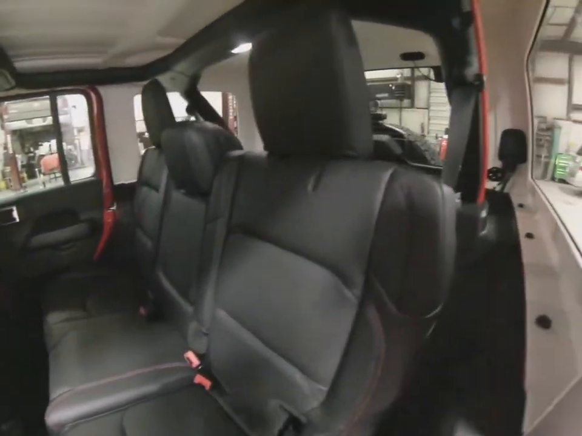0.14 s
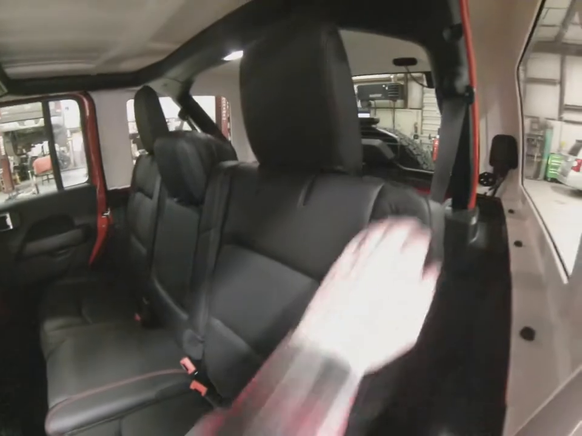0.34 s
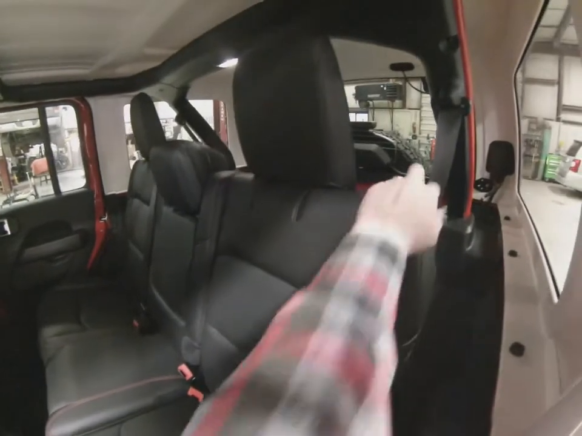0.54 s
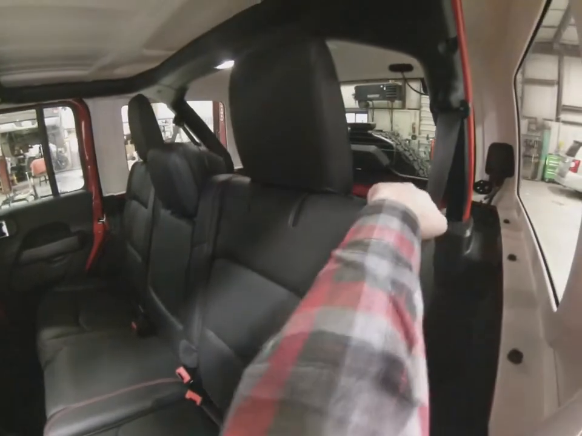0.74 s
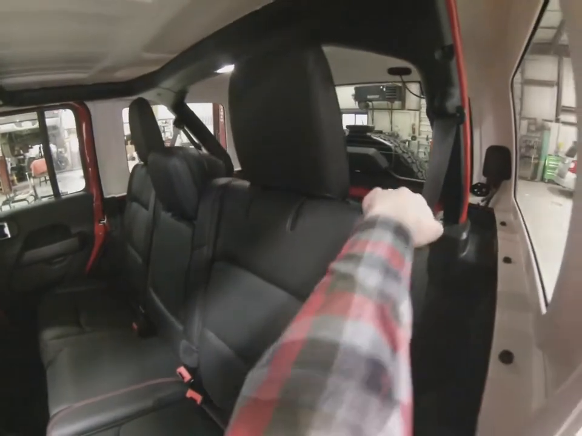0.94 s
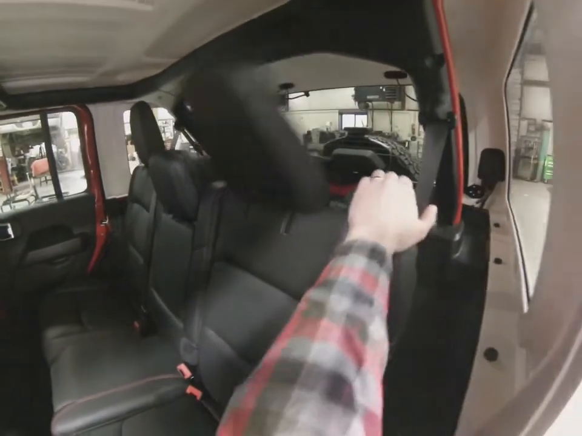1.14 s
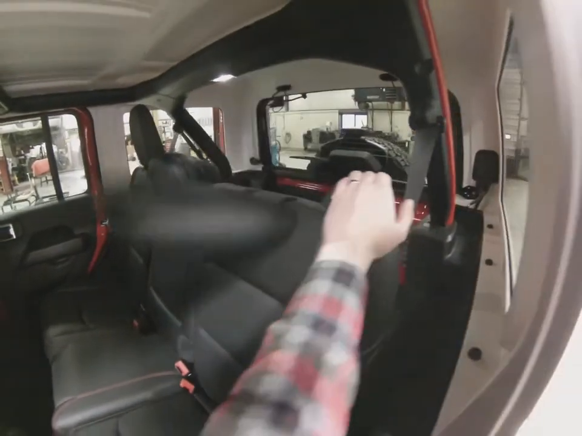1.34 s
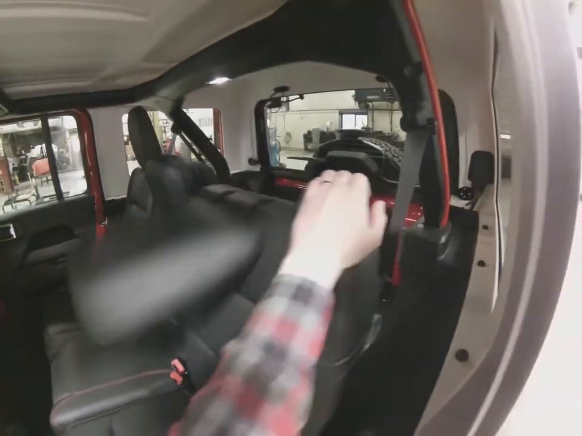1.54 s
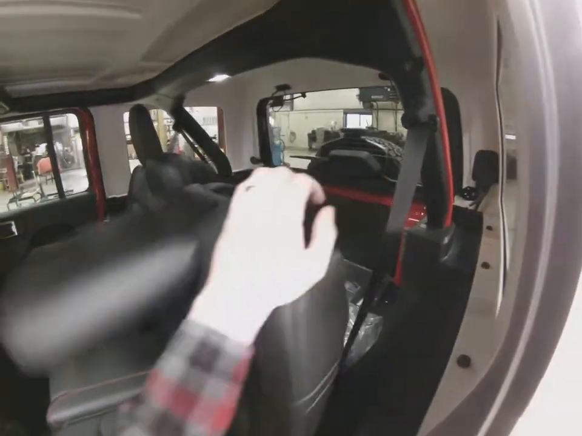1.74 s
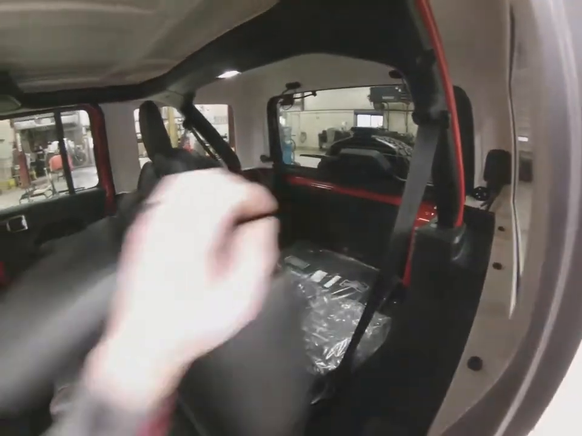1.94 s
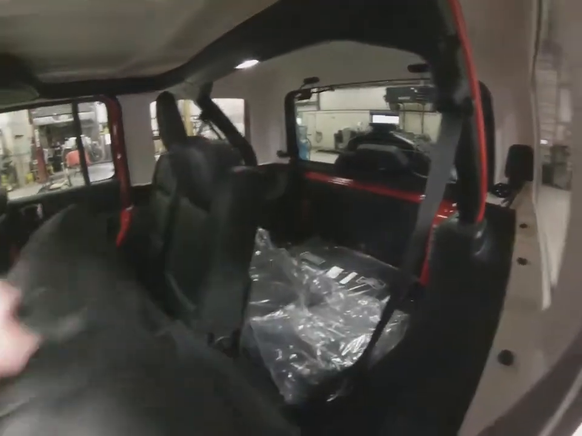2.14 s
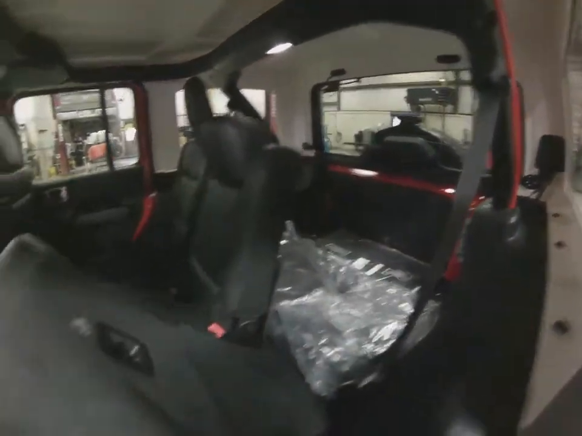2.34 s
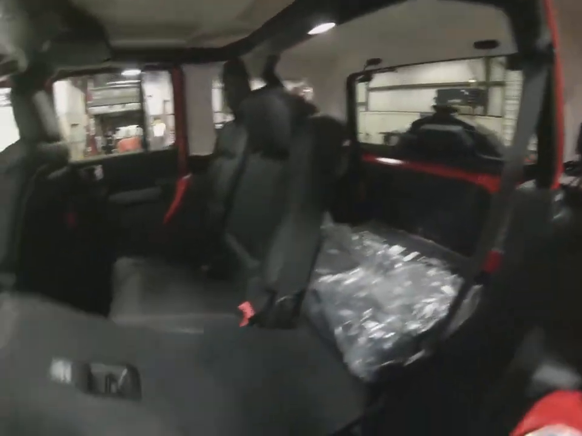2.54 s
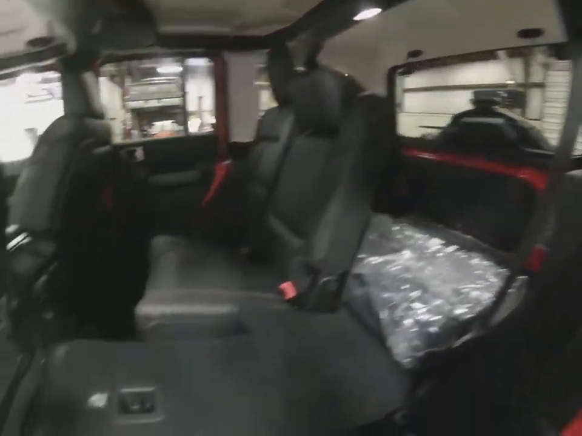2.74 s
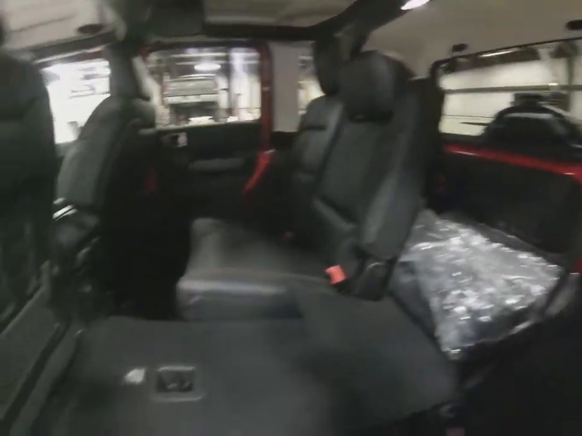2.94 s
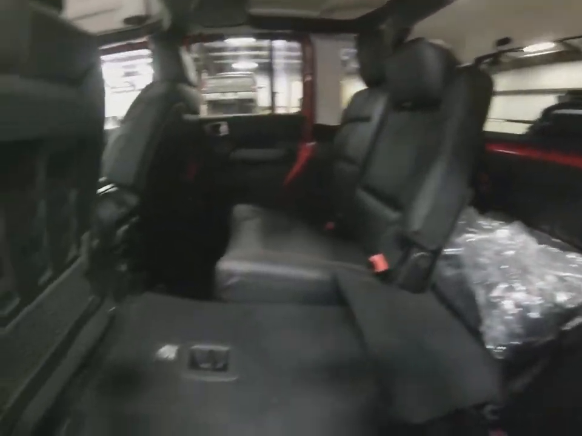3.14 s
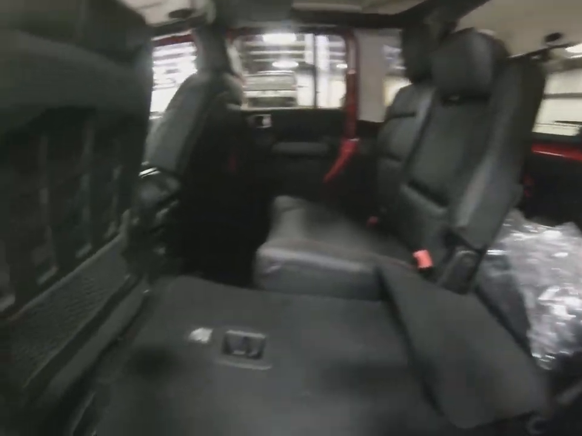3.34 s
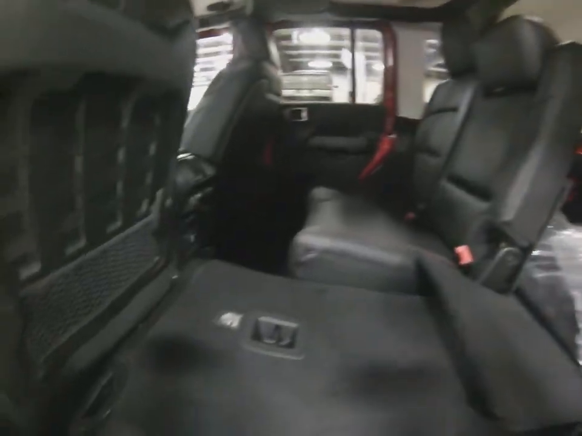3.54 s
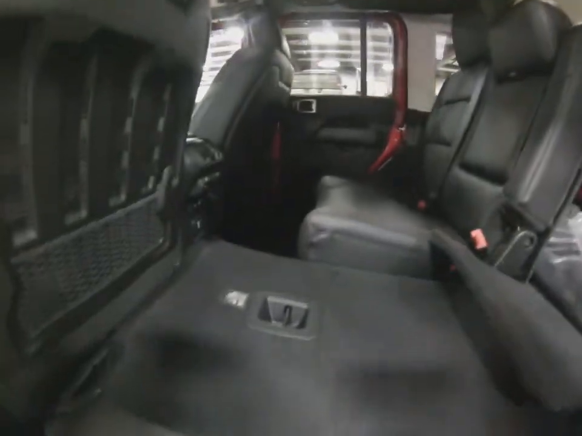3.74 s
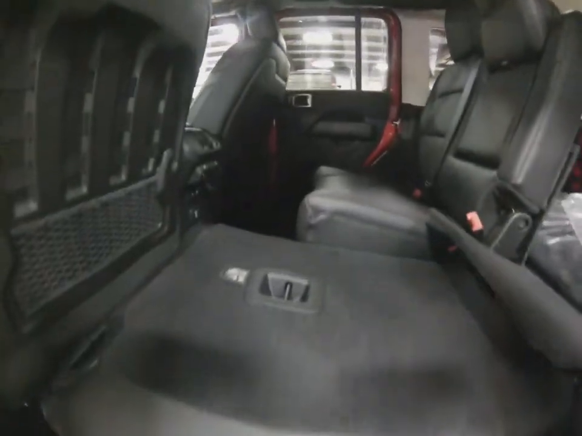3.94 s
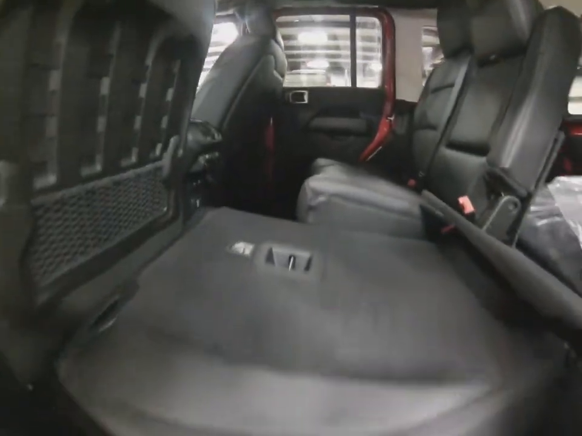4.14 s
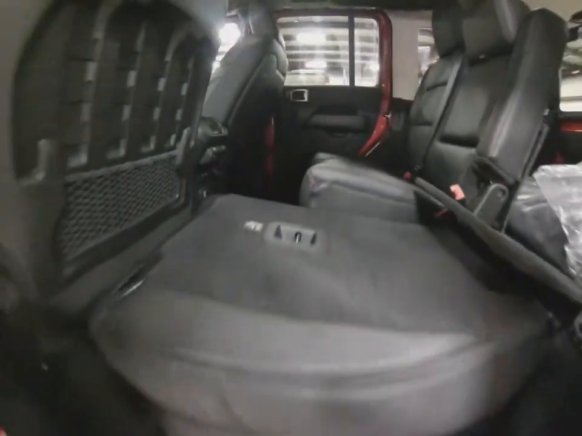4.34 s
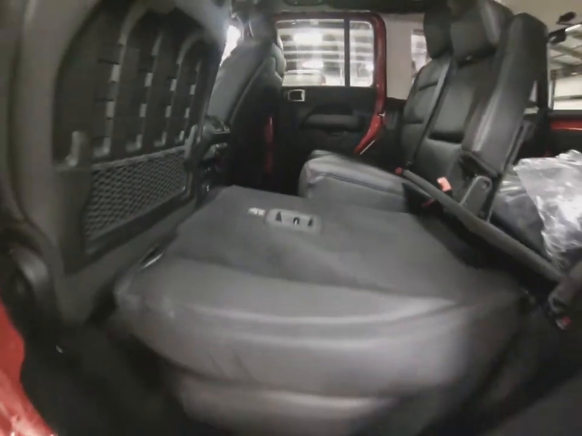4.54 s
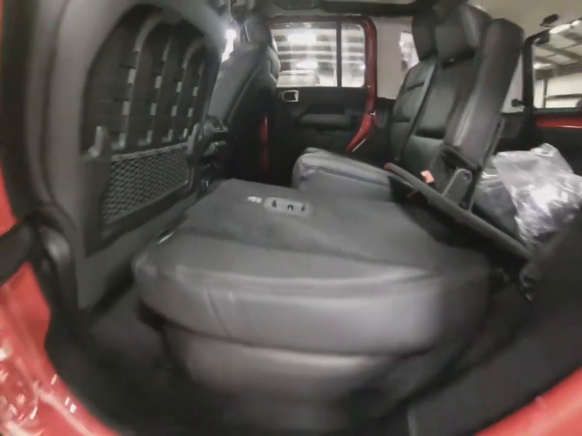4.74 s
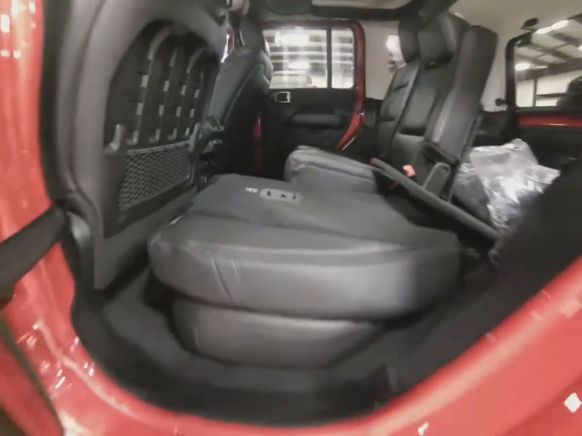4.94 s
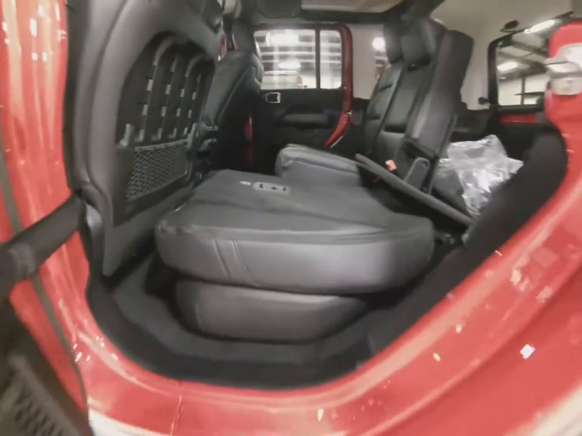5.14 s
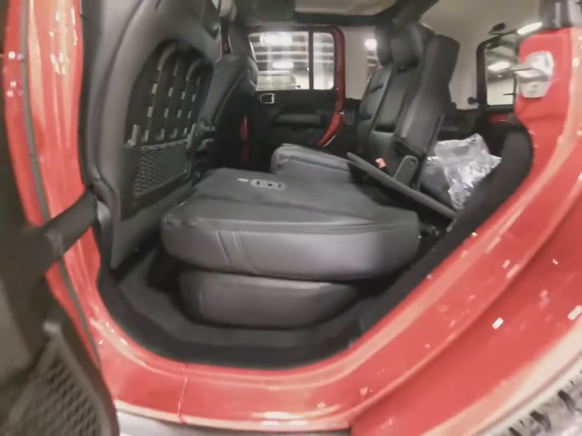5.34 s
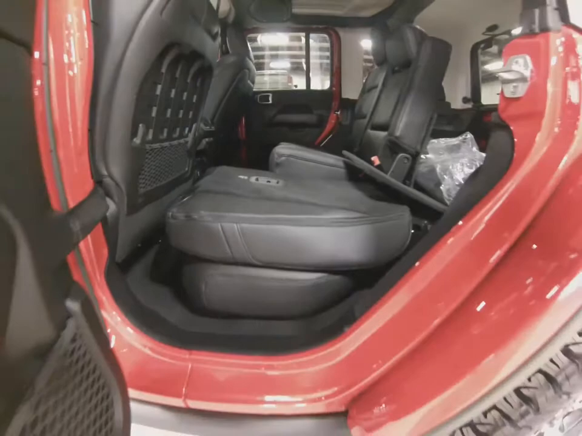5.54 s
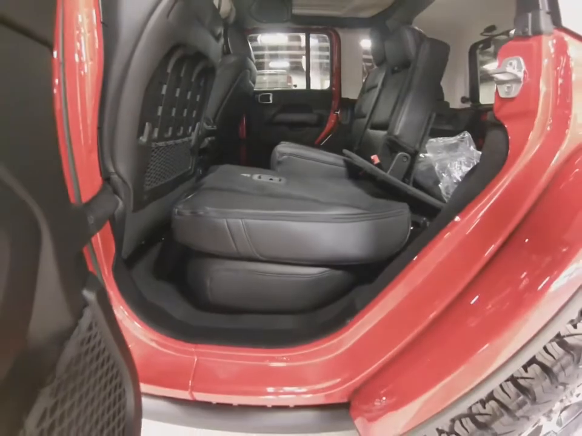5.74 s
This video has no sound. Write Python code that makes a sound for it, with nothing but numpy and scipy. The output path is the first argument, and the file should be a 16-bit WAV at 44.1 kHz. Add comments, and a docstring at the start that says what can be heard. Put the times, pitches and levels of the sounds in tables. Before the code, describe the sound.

After a lever clicks, a headrest bumps and a car seat folds flat with a heavy thump, leaving quiet ventilation noise.

```python
"""In a large showroom, a rear seatback is folded down inside a car that stands with its doors open.
A sleeve swishes and a hand taps the plastic lever; the latch lets go, the headrest flops and bounces,
the hinge squeaks by stick-slip, and the seatback lands on its cushion and shudders on its springs.
Each impact excites the damped modes of a part and the echoes of the cabin; sliding upholstery hisses.
The hall's ventilation grows louder as the listener backs out through the door."""
import sys
import numpy as np
from scipy import signal
from scipy.fft import rfft, irfft, next_fast_len
from scipy.io import wavfile
from scipy.ndimage import uniform_filter1d

SR = 44100
rng = np.random.default_rng(int(sys.argv[2]) if len(sys.argv) > 2 else 0)


def store_wav(level_fs):
    """Save 16-bit WAV to argv[1]."""
    pcm = np.round(np.clip(np.atleast_2d(level_fs), -1, 1) * 32767)
    wavfile.write(sys.argv[1], SR, pcm.T.astype(np.int16))


N = 255716
TIME = np.arange(N) / SR
RELEASE_S, LANDING_S = 1.12, 2.644  # the seatback swings between these times


def amp(db):
    """Amplitude ratio of a level in decibels."""
    return 10 ** (np.asarray(db) / 20)


def unit_rms(x):
    """Normalisation to rms 1."""
    return x / np.sqrt(np.mean(x ** 2) + 1e-20)


def curve_at(points, hz):
    """Interpolation on a logarithmic frequency axis."""
    f, value = np.transpose(points)
    return np.interp(np.log(hz + 1), np.log(f + 1), value)


def add(mix, s, sound):
    """Superposition: a sound joins the mix at time s."""
    part = mix[round(s * SR):][:len(sound)]
    part += sound[:len(part)]


def coloured(x, spectrum, peaks=()):
    """Spectral shaping by a broad curve and narrow resonance peaks, at rms 1."""
    hz = np.fft.rfftfreq(len(x), 1 / SR)
    peaks_db = sum(boost / (1 + (2 * (hz - centre) / width) ** 2) for centre, width, boost in peaks)
    return unit_rms(irfft(rfft(x) * amp(curve_at(spectrum, hz) + peaks_db), len(x)))


def drift(rate_hz, size=N):
    """Random modulation: low-passed noise of rms about 1."""
    n = next_fast_len(size)
    low_pass = np.exp(-(np.fft.rfftfreq(n, 1 / SR) / rate_hz) ** 2)
    return unit_rms(irfft(rfft(rng.standard_normal(n)) * low_pass, n))[:size]


def swing(rise_s, fade_s):
    """Envelope of the swing: exponential growth until release, exponential decay after landing."""
    return np.exp(-np.maximum(RELEASE_S - TIME, 0) / rise_s - np.maximum(TIME - LANDING_S, 0) / fade_s)


def emphasis(hz, tilt_db, focus_hz, focus_db=5.5, focus_octaves=0.33):
    """Excitation in dB: a blow's hardness tilts the spectrum, and its striking point lifts one band."""
    hz = np.maximum(hz, 100)
    slope = tilt_db * np.log2(hz / 1000)
    return slope + focus_db * np.exp(-(np.log2(hz / focus_hz) / focus_octaves) ** 2)


def minimum_phase(x, spectrum, tilt_db, focus_hz, size=8192):
    """Causal filtering: a blow is coloured without sounding before its onset."""
    hz = abs(np.fft.fftfreq(size, 1 / SR))
    gain_db = np.maximum(curve_at(spectrum, hz) + emphasis(hz, tilt_db, focus_hz), -90)
    response = np.fft.ifft(np.exp(np.conj(signal.hilbert(np.log(amp(gain_db)))))).real
    return signal.fftconvolve(x, response[:size // 2])[:len(x)]


# reverberation time of the upholstered cabin: (frequency [Hz], t60 [s])
CABIN_T60 = [(100, 0.33), (300, 0.14), (1000, 0.12), (3000, 0.15), (8000, 0.15), (15000, 0.15)]
def echoes(t, ring):
    """Diffuse reverberation of energy 1: the bass lasts longest, and ring scales the decay times."""
    hz, frame_s, bands = signal.stft(rng.choice([-1., 1.], len(t)), SR, nperseg=128)
    fall_db = -60 * frame_s / (curve_at(CABIN_T60, hz)[:, None] * max(ring, .1))
    tail = signal.istft(bands * amp(fall_db), SR)[1][:len(t)]
    return tail / np.linalg.norm(tail)


def impacts(rows, spectrum, modes, direct, rise_s, modes_db, gain_db):
    """Impact response: a direct crack, its cabin echoes and the damped modes of the struck part."""
    out, t = np.zeros(N), np.arange(16384) / SR
    for s, db, tilt_db, ring, focus_hz in rows:
        crack = echoes(t, ring)
        crack[0] += direct
        ringing = np.zeros(len(t))
        for hz, mode_db, t60 in modes:
            decay = amp(mode_db + emphasis(hz, tilt_db, focus_hz) - 60 * t / t60)
            polarity, detune = rng.choice([-1, 1]), 1 + rng.normal() / 400
            ringing += polarity * decay * np.sin(2 * np.pi * hz * detune * t)
        sound = unit_rms(minimum_phase(crack, spectrum, tilt_db, focus_hz))
        sound += amp(modes_db) * unit_rms(ringing)
        sound *= 1 - np.exp(-t / (rise_s * ring ** 2))  # loose, long blows build up more slowly
        sound *= np.sqrt(.016 * SR) / np.linalg.norm(sound)  # the energy of 16 ms at rms 1
        add(out, s, amp(db + gain_db) * sound)
    return out


# ventilation spectra in the car and at its door: (frequency [Hz], relative level [dB])
VENT_INSIDE = [(29, -47), (50, 4.5), (65, -18.5), (103, -12.5), (150, -19.5), (230, -20), (303, -28),
               (420, -21), (530, -30.5), (800, -30), (1500, -32), (2800, -35), (3400, -38.5),
               (15500, -53.5)]
VENT_OUTSIDE = [(29, -9), (50, 5.5), (103, -3), (175, -12.5), (238, -12.5), (290, -17.5), (420, -16.5),
                (530, -25), (700, -21.5), (1100, -23.5), (1500, -21.5), (2800, -25.5), (3400, -30.5),
                (15500, -46.5)]
# cavity resonances of the cabin: (frequency [Hz], bandwidth [Hz], boost [dB])
CABIN_RESONANCES = [(360, 9.8, 5.5), (446, 18, 4.5), (689, 69, 5), (871, 27, 7), (1120, 32, 6.5),
                    (1330, 26, 4.5), (1443, 38, 5.5), (2650, 76, 4), (4040, 82, 3.5)]
# machine hum, deepest partial first: (frequency [Hz], level inside [dB], level outside [dB])
HUM_PARTIALS = [(31.3, -40, -48), (66, -54, -56), (99.9, -51.5, -46.5), (133.9, -55, -53),
                (233.2, -64.5, -50), (404.5, -75.5, -62.5), (470.5, -65.5, -63.5), (584, -70, -59.5)]
def ventilation(door_s=4.73, crossing_s=0.33, swell_s=4.13, swell_width_s=0.93, swell_db=5.5):
    """Acoustic shielding: the car body screens air noise and hum less as the listener leaves it."""
    outside = 1 / (1 + np.exp((door_s - TIME) / crossing_s))
    air_in = amp(-46) * coloured(rng.standard_normal(N), VENT_INSIDE, CABIN_RESONANCES)
    air_out = amp(-41.5) * coloured(rng.standard_normal(N), VENT_OUTSIDE, CABIN_RESONANCES)
    air = np.sqrt(1 - outside) * air_in + np.sqrt(outside) * air_out
    hum = []
    for hz, in_db, out_db in HUM_PARTIALS:
        gain = amp(in_db + (out_db - in_db) * outside - 0.42 * drift(6.1))
        phase_waver = 0.6 * np.sqrt(hz / 50) * drift(3.66)
        hum.append(gain * unit_rms(np.sin(2 * np.pi * hz * TIME + phase_waver)))
    swell = np.exp(-((TIME - swell_s) / swell_width_s) ** 2)
    hum[0] *= amp(swell_db * swell + 2.0 * drift(3.9))  # the deepest partial swells on the way out
    return air * amp(0.31 * drift(17.0)) + sum(hum)


# spectrum of the low air motion: (frequency [Hz], relative level [dB])
RUMBLE_SPECTRUM = [(8, -5), (22, 5.5), (33, 1.5), (50, -17), (80, -24), (200, -37.5), (600, -84)]
def rumble(hall_db=-44, sway_db=-34, heave_db=-27, heave_fade_s=0.46):
    """Incoherent sources add in power: hall rumble, air swayed by the seat, the car rocked on landing."""
    since = TIME - LANDING_S
    heave = amp(heave_db) * (since > 0) * np.exp(-abs(since) / heave_fade_s)
    sway = amp(sway_db) * swing(rise_s=0.092, fade_s=0.35)
    gain = np.sqrt(amp(hall_db) ** 2 + sway ** 2 + heave ** 2)
    return uniform_filter1d(gain, size=1024) * coloured(rng.standard_normal(N), RUMBLE_SPECTRUM)


# strokes of the sleeve: (time [s], duration [s], level [dB])
SLEEVE_STROKES = [(0.261, 0.62, -62.5), (1.06, 0.54, -57), (2.277, 0.48, -57), (2.903, 0.28, -61),
                  (4.604, .09, -66)]
# their spectrum: (frequency [Hz], relative level [dB])
SLEEVE_SPECTRUM = [(1000, -36), (4000, 1), (7000, 2), (10000, -0.5), (13000, 4), (15500, -4.5)]
def sleeve_swishes():
    """Friction noise: fabric brushes past in short, airy strokes."""
    out = np.zeros(N)
    for s, length, db in SLEEVE_STROKES:
        stroke = signal.windows.tukey(round(length * SR), .8)
        add(out, s, amp(db) * stroke * coloured(rng.standard_normal(len(stroke)), SLEEVE_SPECTRUM))
    return out


# the hand reaches the seat: (time [s], level [dB], centre frequency [Hz], t60 [s])
HAND_TICK = [(0.4455, -26.5, 9640, 0.0035)]
def hand_tick(spread=0.22, rise_s=0.00016, echo_db=-9):
    """Heavy damping: three high partials die within milliseconds, a snap with faint cabin echoes."""
    out, t = np.zeros(N), np.arange(4096) / SR
    for s, db, hz, t60 in HAND_TICK:
        partials = sum(np.sin(2 * np.pi * hz * (1 + spread * k) * t) / (1 + abs(k)) for k in (-1, 0, 1))
        snap = amp(db - 60 * t / t60) * partials * (1 - np.exp(-t / rise_s))
        add(out, s, snap + amp(echo_db) * signal.fftconvolve(snap, echoes(t, 0.49))[:len(t)])
    return out


# taps on the lever: (time [s], relative level [dB], tilt [dB/octave], ring [ratio], focus [Hz])
LEVER_TAPS = [(.5252, -40.5, 2.5, 0.59, 740), (.539, -45.5, 0, 0.49, 2200), (.978, -37, 2, 0.5, 1200),
              (.992, -43.5, 2.5, 1.5, 330)]
# their spectrum: (frequency [Hz], relative level [dB])
LEVER_SPECTRUM = [(120, 3), (250, -4), (500, -5), (700, -5), (900, -6), (1230, -2.5), (1700, -11),
                  (2200, -13), (3400, -16), (4700, -25), (8000, -28.5), (15500, -39)]
# modes of the lever: (frequency [Hz], relative level [dB], t60 [s])
LEVER_RESONANCES = [(716, -5, .06), (1235, 0, .04), (1410, -13, .04), (2900, -12, .04), (3600, -19, .03),
                    (5650, -21, .05), (7920, -25, .1)]
def lever():
    """Shell resonance: the hollow plastic release lever rings briefly under each tap."""
    return impacts(LEVER_TAPS, LEVER_SPECTRUM, LEVER_RESONANCES,
                   direct=0.11, rise_s=0.00023, modes_db=-1, gain_db=5)


# latch and hinge lock: (time [s], relative level [dB], tilt [dB/octave], ring [ratio], focus [Hz])
LATCH_CLACKS = [(1.036, -38, 1, 1.3, 3550), (1.043, -40, -0.5, 0.47, 3600), (1.053, -38, 5, 0.59, 560),
                (1.063, -39.5, 3, 0.63, 12600), (1.921, -34, 2, 0.38, 4730),
                (1.9265, -31.5, -0.5, 0.73, 750), (1.934, -31.5, -5.5, 0.46, 1070),
                (2.038, -48.5, -1.5, 1.1, 2650), (2.508, -50, 2.5, 0.81, 7400)]
# their spectrum: (frequency [Hz], relative level [dB])
STEEL_SPECTRUM = [(80, -5), (200, -15), (400, -2.5), (830, -2.5), (1150, -4), (1500, -6.5), (1750, -9.5),
                  (3050, -10.5), (3800, -16.5), (5100, -14.5), (7000, -17), (8600, -16.5), (11200, -26),
                  (13200, -19), (15500, -29)]
# modes of the steel parts: (frequency [Hz], relative level [dB], t60 [s])
STEEL_MODES = [(575, 4, 0.078), (745, 5.5, 0.036), (1180, 4, 0.055), (1830, 0, 0.12), (5240, -6, 0.097),
               (6400, -11, 0.057), (6400, -7.5, 0.11), (8350, -7, .1), (8800, -18, 0.15), (9700, -24, .09)]
def latch():
    """Hard contact: brief blows in the steel latch and hinge lock excite modes far into the treble."""
    return impacts(LATCH_CLACKS, STEEL_SPECTRUM, STEEL_MODES,
                   direct=0.22, rise_s=0.00019, modes_db=-7.5, gain_db=3.5)


# blows of the seatback: (time [s], relative level [dB], tilt [dB/octave], ring [ratio], focus [Hz])
SEATBACK_THUDS = [(1.036, -37, -4.5, 1.1, 280), (1.053, -35.5, -3, 0.66, 520), (2.149, -43, 1, 1.25, 350),
                  (2.476, -42, -1, 1.7, 350), (2.507, -43, -4.5, 1.4, 260), (2.657, -37.5, -4.5, 0.88, 240),
                  (2.705, -36, -1.5, 0.5, 340), (2.738, -26.5, -1.5, 0.9, 348), (2.81, -40.5, 0, 2.9, 130)]
# their spectrum: (frequency [Hz], relative level [dB])
PADDED_SPECTRUM = [(50, -29.5), (90, 1), (160, -4.5), (250, -4), (350, -0.5), (480, -0.5), (620, -21),
                   (780, -6.5), (1000, -8.5), (1480, -14), (2500, -21), (3400, -23), (9000, -45),
                   (15000, -44)]
# modes of the padded seat: (frequency [Hz], relative level [dB], t60 [s])
PADDED_MODES = [(139.8, -3.5, 0.22), (202.6, 1, 0.1), (312, -3, 0.14), (344, 0.5, 0.06), (456, 13, 0.035),
                (606, -1.5, 0.091), (732, -5, 0.064), (1115, -12.5, 0.074), (1467, -7, 0.14)]
def padded_thuds():
    """Soft contact: padding lengthens the blows of seatback and headrest, so low modes dominate."""
    return impacts(headrest_knocks() + SEATBACK_THUDS, PADDED_SPECTRUM, PADDED_MODES,
                   direct=0.87, rise_s=0.0016, modes_db=-2, gain_db=4)


# leather drags as the headrest folds and the cushions meet: (peak time [s], duration [s], level [dB])
LEATHER_DRAGS = [(1.196, 0.13, -56.5), (1.363, 0.44, -48), (1.634, 0.26, -42.5), (2.24, 0.25, -49.5),
                 (2.506, 0.27, -47.5), (2.698, 0.18, -38)]
# spectrum of the rubbing: (frequency [Hz], relative level [dB])
LEATHER_SPECTRUM = [(150, 14.5), (500, 5), (1500, 5), (3000, -3), (6000, -6), (10000, -13.5), (13500, -13),
                    (15500, -14)]
def upholstery_rub(slide_db=-51.5, catches_per_s=900, catch_gain=1.7, flutter_db=2.2):
    """Sliding friction: upholstery hisses through the swing, with tiny catches and short swells."""
    power = (amp(slide_db) * swing(rise_s=0.21, fade_s=0.27)) ** 2
    for s, length, db in LEATHER_DRAGS:
        add(power, s - length / 2, (amp(db) * np.hanning(round(length * SR))) ** 2)
    catches = (rng.random(N) < catches_per_s / SR) * rng.exponential(1, N) * rng.choice([-1, 1], N)
    gain = np.sqrt(power) * amp(flutter_db * drift(22))
    return gain * coloured(rng.standard_normal(N) + catch_gain * catches, LEATHER_SPECTRUM)


# headrest flops: (time [s], relative level [dB], rebound delay [s], relative rebound level [dB])
HEADREST_FLOPS = [(1.3102, -30.5, 0.031, -30.5), (1.601, -34, 0.03, -30.5), (1.812, -39, .036, -34.5),
                  (2.011, -43.5, 0.043, -37.5)]
def headrest_knocks(loosening=1.18, hollow_hz=720, padded_hz=300):
    """Inelastic bouncing: impact rows of a hollow knock and a padded rebound, looser with each flop."""
    knocks = []
    for k, (s, db, delay_s, rebound_db) in enumerate(HEADREST_FLOPS):
        ring = 0.98 * loosening ** k
        knocks.append((s, db, -1.5 + k, ring, hollow_hz))  # brighter each time
        knocks.append((s + delay_s, rebound_db, -0.5 - 1.1 * k, ring, padded_hz))  # duller each time
    return knocks


def post_rattle(count=5, length_s=0.066, offset_db=-10.5, tilt_db=-3, ring=0.52, focus_hz=1580):
    """Mechanical play: impact rows of the headrest's posts clicking in their guides at every flop."""
    fractions = (np.arange(count) + rng.random((len(HEADREST_FLOPS), count))) / count
    return [(s + length_s * fraction, db + offset_db, tilt_db, ring, focus_hz)
            for (s, db, _, _), row in zip(HEADREST_FLOPS, fractions) for fraction in row]


# trim panel clicks: (time [s], relative level [dB], tilt [dB/octave], ring [ratio], focus [Hz])
TRIM_CLICKS = [(2.212, -42, -0.5, 0.82, 1900), (2.234, -33, -1.5, 0.81, 1750),
               (2.276, -34.5, 1.5, 1.0, 2150), (2.297, -37.5, -4.5, 1.5, 1180),
               (2.477, -43, 1.5, 0.36, 1560)]
# their spectrum: (frequency [Hz], relative level [dB])
TRIM_SPECTRUM = [(150, 0.5), (500, -1), (1100, -3.5), (1900, -5), (2800, -10.5), (4500, -14), (8000, -20.5),
                 (15500, -25)]
# modes of the trim: (frequency [Hz], relative level [dB], t60 [s])
TRIM_MODES = [(1151, 11, 0.078), (1570, -10, 0.049), (1880, 10, 0.029), (2240, -5, 0.071), (5600, -10, .08)]
def trim_clicks():
    """Damped vibration: plastic post guides and trim panels click dryly as the seatback swings."""
    return impacts(TRIM_CLICKS + post_rattle(), TRIM_SPECTRUM, TRIM_MODES,
                   direct=0.18, rise_s=0.00048, modes_db=-6, gain_db=-2)


# padding bottoms out under the hardest blows: (time [s], peak level [dB], contact duration [s])
PADDING_BUMPS = [(1.3155, -12.5, 0.0023), (1.3437, -17.5, 0.0019), (1.361, -22, 0.0081),
                 (1.606, -22.5, 0.007), (1.661, -21, 0.009), (1.943, -24.5, 0.0081), (2.067, -21.5, 0.0062),
                 (2.7073, -13.5, 0.0032), (2.737, -9.5, 0.0099)]
def padding_bumps(echo_db=-7):
    """Air displacement: one smooth pressure pulse with a dull echo, deeper the longer the contact."""
    out, t = np.zeros(N), np.arange(8192) / SR
    for s, db, contact_s in PADDING_BUMPS:
        pulse = -amp(db) * np.sin(np.pi * np.minimum(t / contact_s, 1)) ** 2
        add(out, s, pulse + amp(echo_db) * signal.fftconvolve(pulse, echoes(t, 0.93))[:len(t)])
    return out


# the seat on its springs: (time [s], level [dB], frequency [Hz], t60 [s], step per overtone [dB])
SEAT_SHUDDERS = [(1.339, -15.5, 35.7, 0.45, -15), (1.392, -12.5, 30.4, 0.61, -27),
                 (1.632, -18.5, 31, 1.3, -34), (1.888, -25.5, 33, 1.06, -9),
                 (2.098, -23.5, 25.5, 0.86, -18), (2.751, -12, 45, 0.15, -25),
                 (2.744, -15.5, 17.6, 2.8, -8), (2.935, -16, 41, 0.33, -16)]
def seat_shudder(rise_s=0.0046, uneven_db=2):
    """Nonlinear stiffness: the seat bounces unevenly on stiffening foam, so its swing has overtones."""
    out, t = np.zeros(N), np.arange(2 * SR) / SR
    for s, db, hz, t60, overtone_db in SEAT_SHUDDERS:
        bounce = sum(amp((k - 1) * overtone_db - 60 * t * np.sqrt(k) / t60)
                     * np.sin(2 * np.pi * k * hz * t) for k in range(1, 5))
        gain = amp(db + uneven_db * drift(9, size=len(t))) * (1 - np.exp(-t / rise_s))
        add(out, s, gain * bounce)
    return out


# squeaks of the hinge: (time [s], duration [s], frequency [Hz], level [dB])
HINGE_SQUEAKS = [(2.435, 0.086, 1563, -51), (2.473, 0.018, 1544, -41.5), (2.681, 0.009, 1680, -36),
                 (2.69, 0.024, 1627, -43)]
def hinge_squeaks(jitter=0.096, chatter=0.43):
    """Stick-slip friction: the hinge sings at an unsteady pitch and strength."""
    out = np.zeros(N)
    for s, length, hz, db in HINGE_SQUEAKS:
        n = round(length * SR)
        cycles = np.cumsum(hz * (1 + jitter * drift(580, size=n))) / SR
        slips = np.sin(2 * np.pi * cycles) * (1 + chatter * drift(260, size=n))
        add(out, s, amp(db) * unit_rms(slips * signal.windows.tukey(n, .7)))
    return out


# the frame hits its stop: (time [s], relative level [dB], tilt [dB/octave], ring [ratio], focus [Hz])
FRAME_BLOWS = [(2.7172, -19, 1.34, 0.8, 1510), (2.7235, -18.5, -2, 0.85, 1030),
               (2.735, -25, 0.5, 0.46, 2420)]
# their spectrum: (frequency [Hz], relative level [dB])
FRAME_SPECTRUM = [(70, -15), (125, 1.5), (175, -10), (260, -3), (480, -10), (680, 0), (1150, -14),
                  (1520, -7.5), (1850, -11.5), (2450, -15), (3150, -19.5), (4000, -24), (6500, -30.5),
                  (8000, -36.5), (15000, -43)]
# modes of the frame: (frequency [Hz], relative level [dB], t60 [s])
FRAME_MODES = [(345, -3, .09), (690, -7, .09), (1114, -4, .08), (1340, -3, .06), (1470, -3, .055),
               (1555, 0, .06), (1647, -3, .07), (1706, -3, .07), (2188, -4, .07), (2433, -2, .05),
               (2832, -8, .05)]
def frame_slam():
    """Impulsive excitation: the stop is hard and near, so the frame rings with a strong direct crack."""
    return impacts(FRAME_BLOWS, FRAME_SPECTRUM, FRAME_MODES,
                   direct=0.8, rise_s=0.0001, modes_db=-5, gain_db=-3.5)


def showroom_echo(x, wet_db=-27, ring=9):
    """Coupled rooms: a little of each blow escapes by the open door and returns from the big hall."""
    return amp(wet_db) * signal.fftconvolve(x, echoes(np.arange(SR) / SR, ring))[:N]


def scene(quadrature_db=-31, diffuse_db=-72, hiss_db=-77):
    """Mid-side stereo, almost mono: the channels differ by a slight phase shift, diffuse air and hiss."""
    hits = lever() + trim_clicks() + latch() + padded_thuds() + frame_slam() + padding_bumps()
    mid = (hits + showroom_echo(hits) + seat_shudder() + hinge_squeaks() + hand_tick()
           + upholstery_rub() + sleeve_swishes() + ventilation() + rumble())
    diffuse_air = amp(diffuse_db) * coloured(rng.standard_normal(N), VENT_OUTSIDE)
    side = amp(quadrature_db) * signal.hilbert(mid).imag + diffuse_air
    return np.array([mid + side, mid - side]) + amp(hiss_db) * rng.standard_normal((2, N))


def record(dry, cutoff_hz=15650):
    """Band limiting: a linear-phase low-pass filter removes the highest treble."""
    low_pass = signal.firwin(511, cutoff_hz, window=("kaiser", 9), fs=SR)
    return signal.oaconvolve(dry, low_pass[None], "same")


dry = scene()
out = record(dry)
store_wav(out)
```